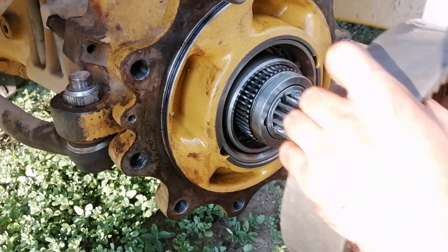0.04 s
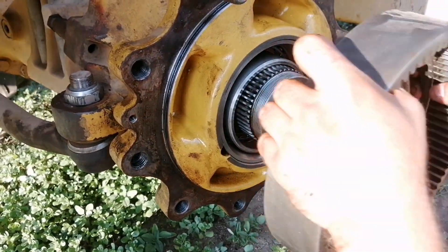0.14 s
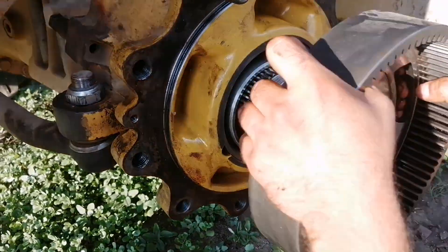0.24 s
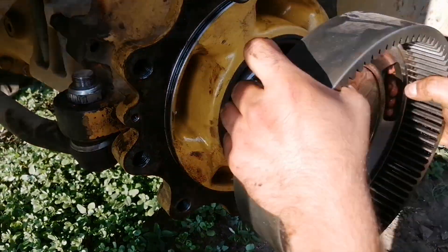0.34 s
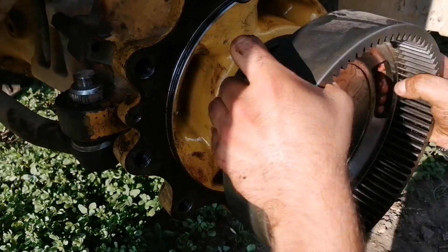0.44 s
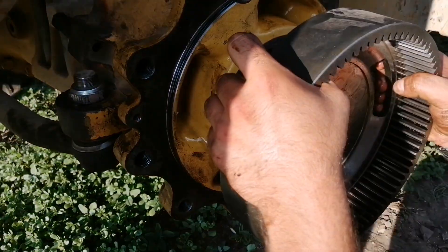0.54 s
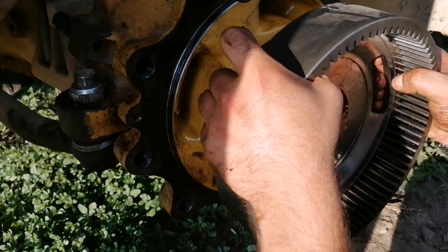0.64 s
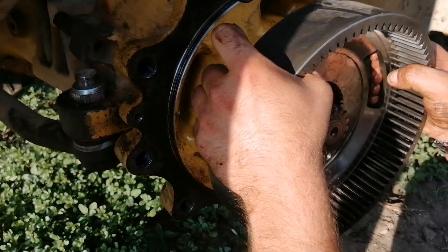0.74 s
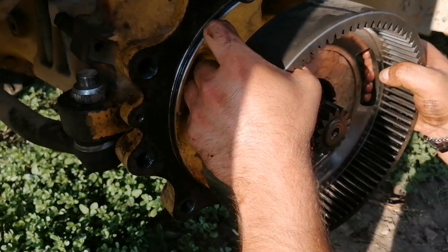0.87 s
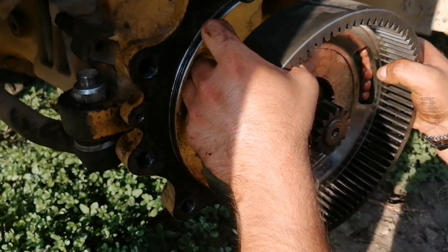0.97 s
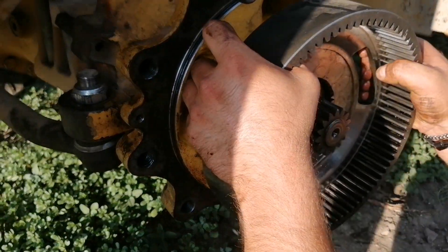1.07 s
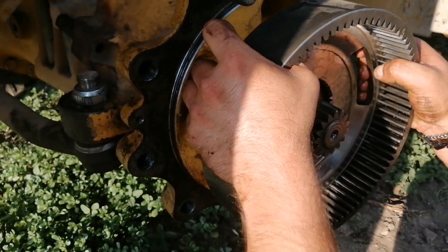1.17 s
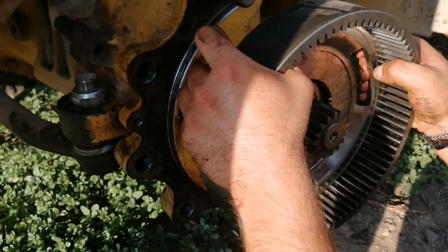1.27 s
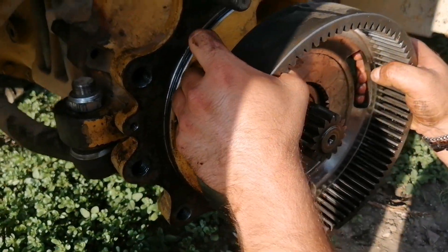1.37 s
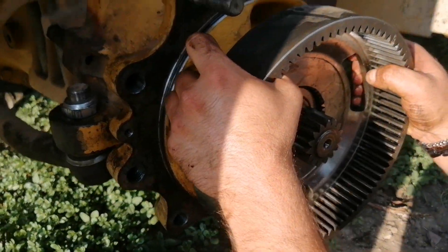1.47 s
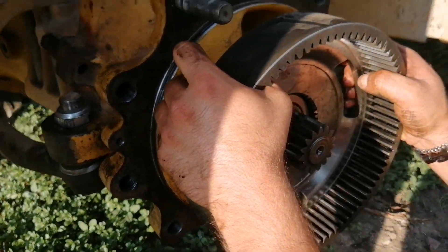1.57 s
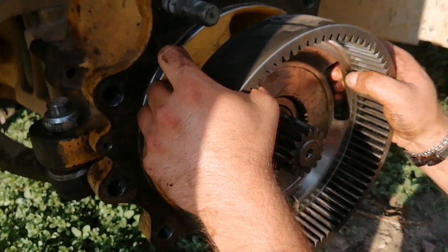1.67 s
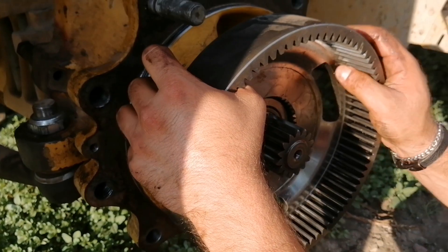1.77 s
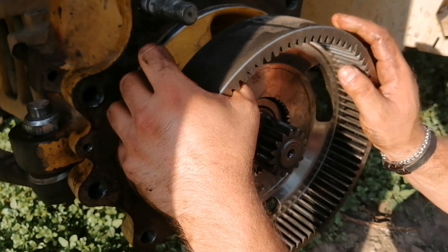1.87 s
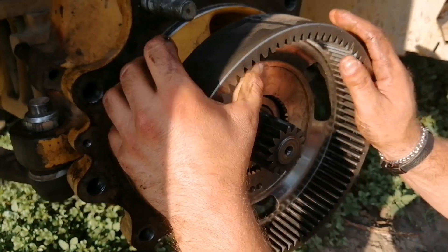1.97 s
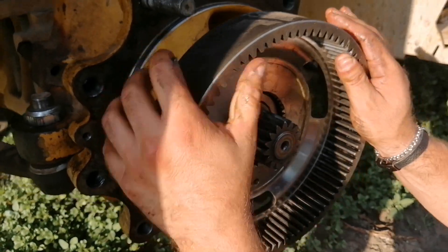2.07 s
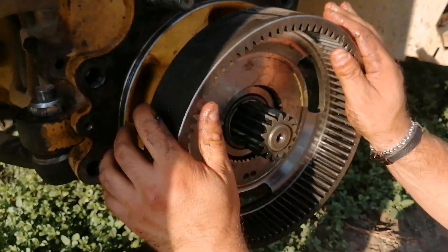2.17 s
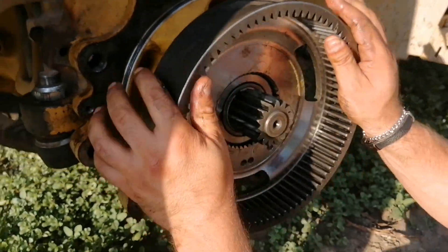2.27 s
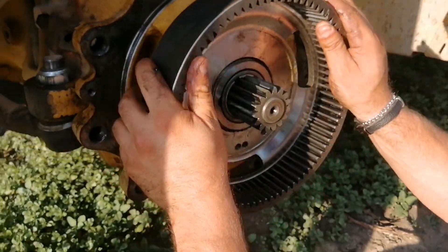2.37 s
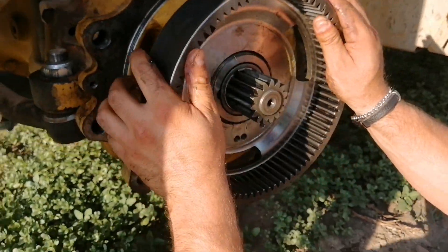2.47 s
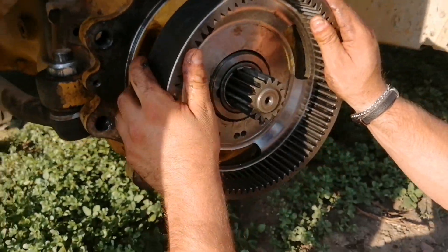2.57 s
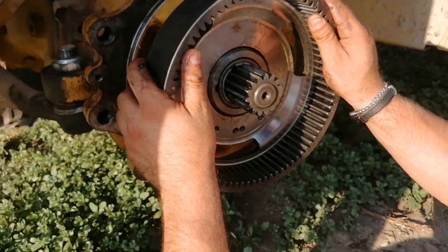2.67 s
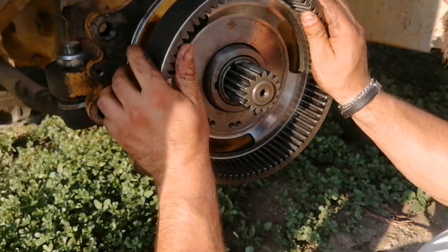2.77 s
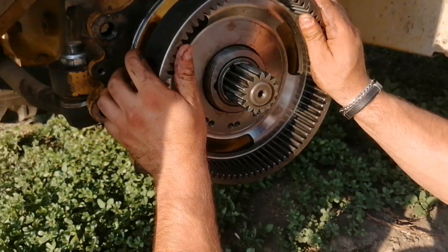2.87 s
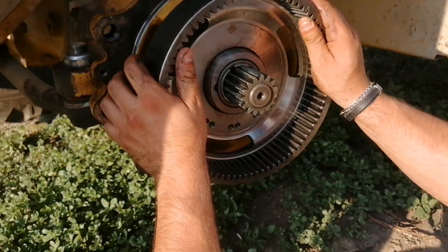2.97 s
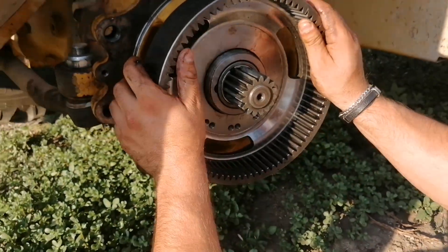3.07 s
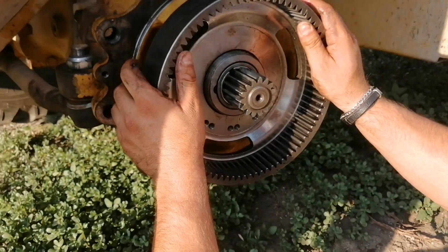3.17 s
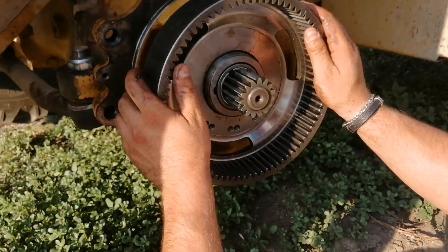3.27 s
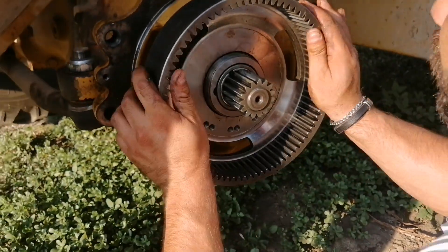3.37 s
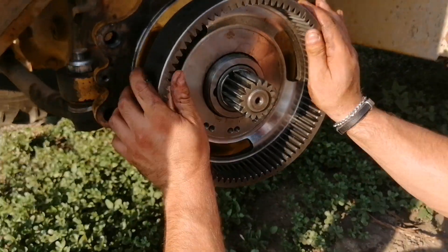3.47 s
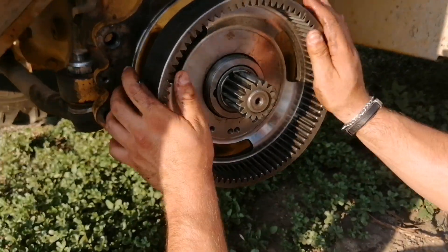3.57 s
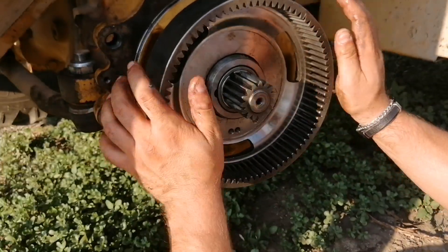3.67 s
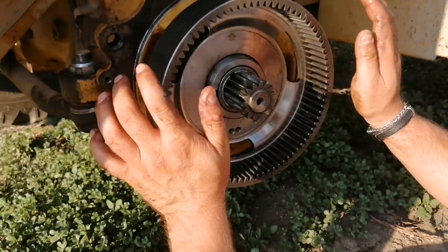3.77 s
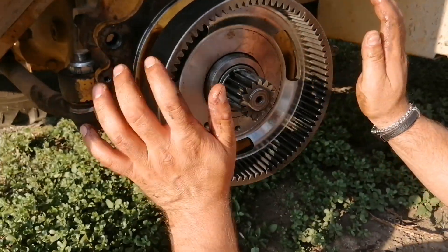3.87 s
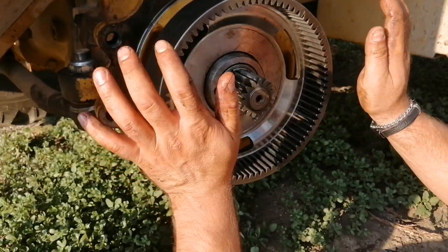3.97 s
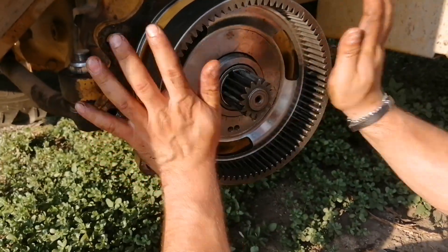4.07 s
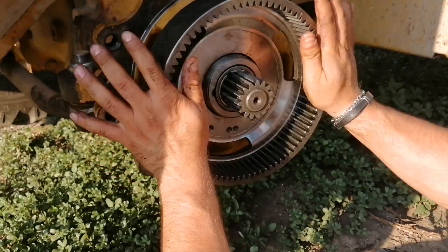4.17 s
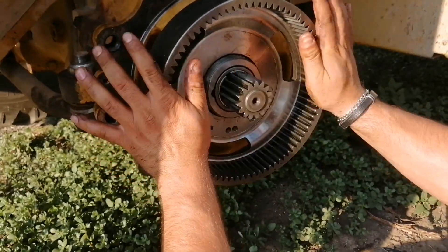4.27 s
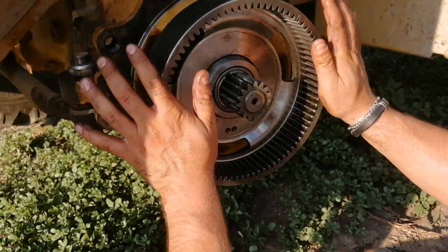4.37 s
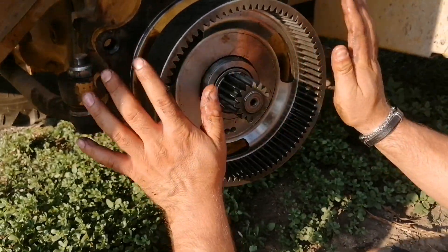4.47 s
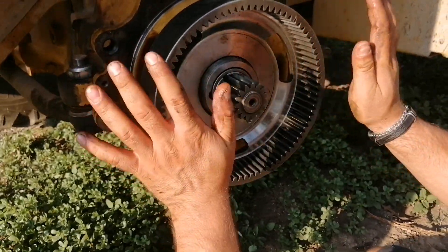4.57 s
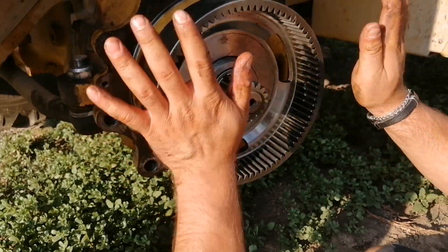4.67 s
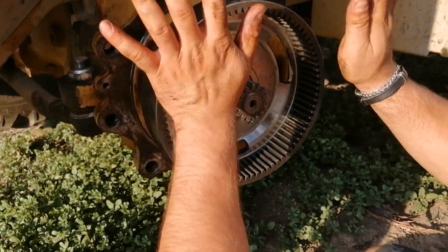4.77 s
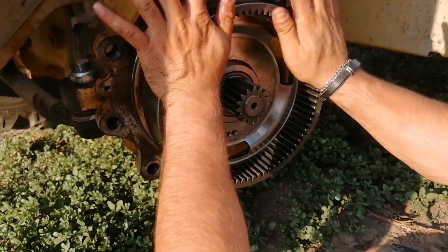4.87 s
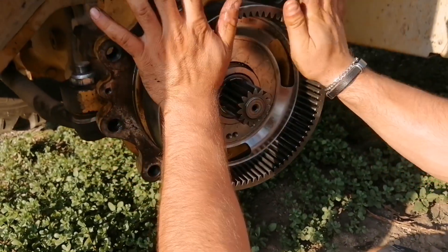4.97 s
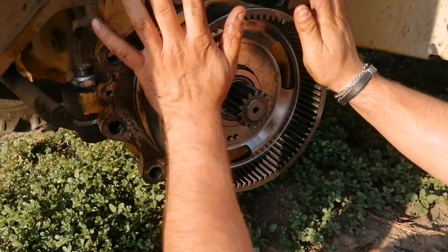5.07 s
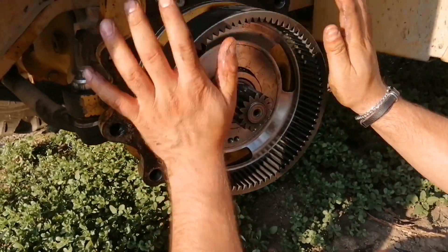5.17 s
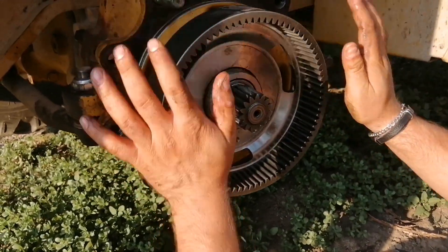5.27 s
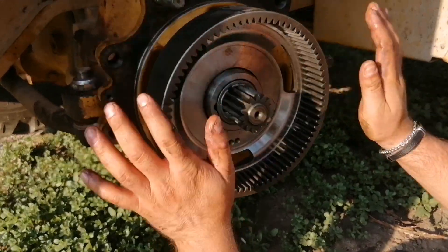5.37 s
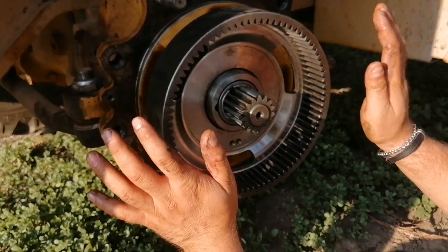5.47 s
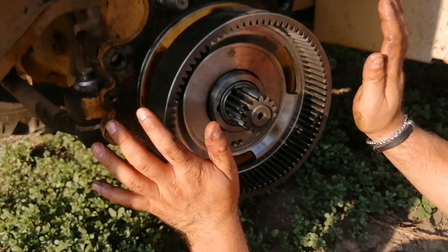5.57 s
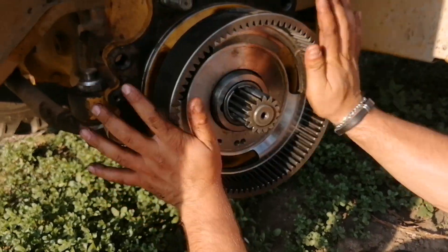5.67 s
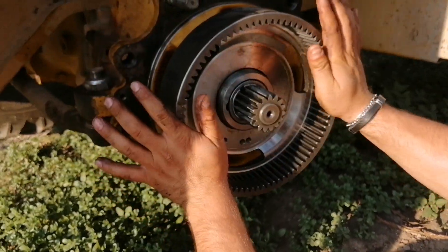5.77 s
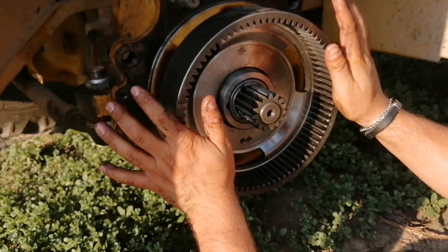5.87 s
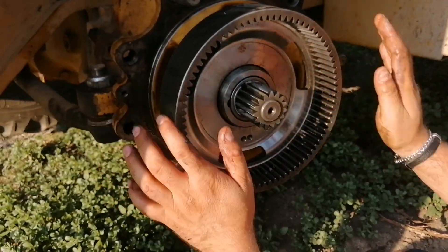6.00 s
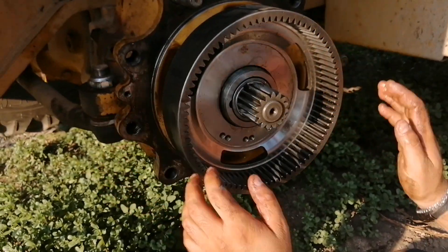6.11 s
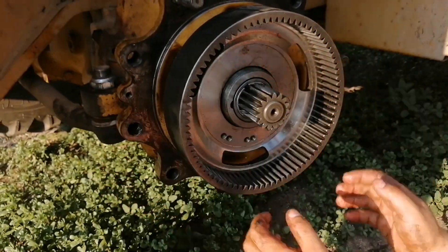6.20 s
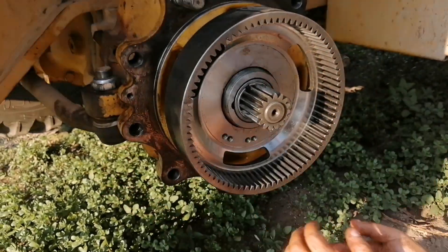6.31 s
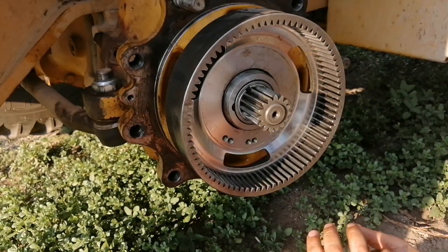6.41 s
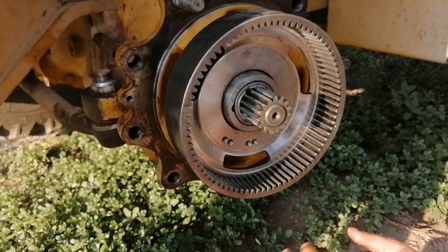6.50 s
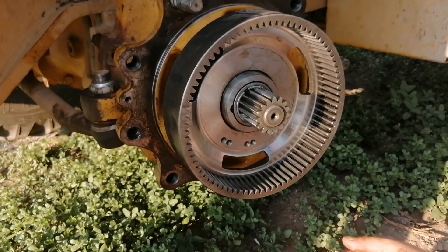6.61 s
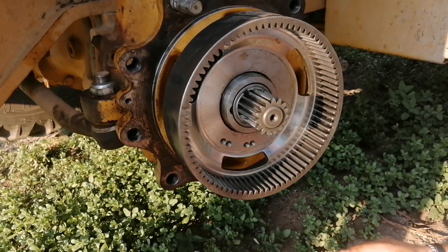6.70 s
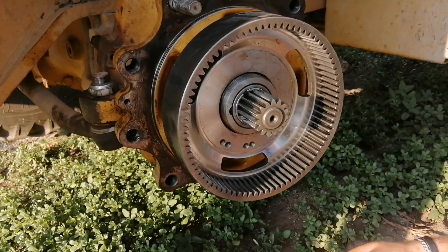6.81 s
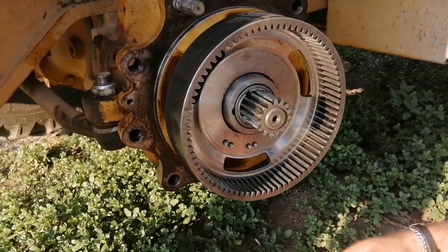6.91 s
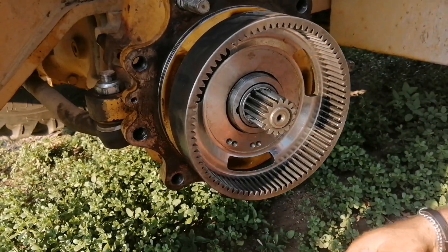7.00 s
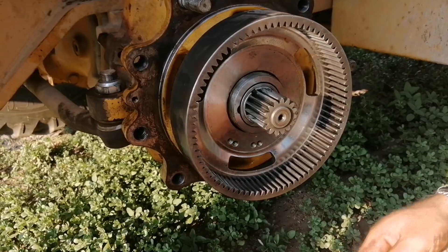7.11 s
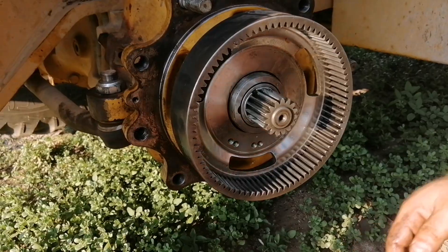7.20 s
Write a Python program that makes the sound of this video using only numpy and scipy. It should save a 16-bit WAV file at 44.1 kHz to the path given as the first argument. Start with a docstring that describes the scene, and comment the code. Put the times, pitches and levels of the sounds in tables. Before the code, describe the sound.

A heavy steel gear knocks, scrapes and briefly squeals onto a splined shaft outdoors, clanking home at three seconds, then sparse clunks with faint bird chirps.

```python
"""A heavy steel ring gear is worked by hand onto a splined axle shaft, outdoors and close to two microphones.
Its teeth knock on the splines: each blow is a sum of fading tones. A low boom, set separately, follows
some of the blows and strokes. Sliding makes shaped noise, ringing resonances and short squeals; the hub face drags.
Hands scuff and bump as soft noise; a small bird calls in gliding tones far off, above a quiet noise background."""
import sys
import numpy as np
from scipy import signal
from scipy.fft import rfft, irfft, next_fast_len
from scipy.io import wavfile
from scipy.ndimage import uniform_filter1d

SR = 44100
rng = np.random.default_rng(int(sys.argv[2]) if len(sys.argv) > 2 else 0)


def int16_out(signal):
    """Quantize to a 16-bit WAV file."""
    q = np.round(np.clip(np.atleast_2d(signal).T, -1, 1) * 32767)
    wavfile.write(sys.argv[1], SR, q.astype(np.int16))


N = 319591
TIME = np.arange(N) / SR  # seconds

# Levels, tones and fade times below are starting points; the functions add gains and chance variation.
# Teeth hitting splines: (t/s, level/dB, bass/dB, treble/dB, favoured f/Hz, contact/s, left minus right/dB)
TOOTH_KNOCKS = [(0.6521, -18, -10.5, -3.5, 1480, 0.00019, -2), (0.6538, -15, -17, -1, 3100, 0.00031, -1),
                (0.7646, -37.5, -3, -15, 1270, 0.0047, -3), (0.7849, -33.5, -3.5, -4.5, 2400, 0.0011, -6),
                (0.873, -57, 8.5, 3, 6000, 0.0051, -2), (0.9756, -36, 6, -10.5, 1510, 0.0051, 3.5),
                (0.9946, -24, -0.5, -14.5, 1600, 0.0033, 6.5), (1.005, -24, -4, -17, 1100, 0.0052, 2),
                (1.028, -39, -1, -11, 2390, 0.0042, 10), (1.083, -22.5, -1.5, -2, 2500, 0.0033, 5),
                (1.348, -51, 12.5, -32, 1000, 0.0041, 6), (1.446, -35.5, 1, -26, 1400, .003, 11),
                (1.455, -33, -2, -21, 950, .002, 2.5), (1.7185, -51, -2.5, -20, 1200, 0.0075, -2),
                (1.8354, -42.5, 7.5, -11.5, 830, 0.0028, -0.5), (2.1368, -33, 1, -9.5, 6040, 0.00033, -5),
                (2.4462, -29, -10.5, -9, 1200, 0.0037, -7), (2.526, -29.5, -24, 11.5, 5000, .003, 3.5),
                (2.9179, -31, -3, -6.5, 900, 0.0027, -0.5), (2.945, -21, -1, -8, 620, 0.002, 0.5),
                (2.965, -13.5, -4, -1, 760, 0.0023, 3), (3.4, -42.5, -23, 1, 2370, 0.014, -4),
                (3.648, -28.5, 6, 3.5, 1730, 0.0058, -2), (3.8022, -42, -0.5, -10.5, 2500, 0.0047, -7),
                (4.2274, -57.5, -16, -0.5, 2300, 0.0037, -1), (4.3, -24, -3.5, 5, 2300, 0.0013, 4),
                (4.3049, -23, 7.5, -5, 1230, 0.0013, -4.5), (4.3124, -28, 9.5, -5.5, 745, 0.0016, -3.5),
                (4.347, -37, 6.5, 1.5, 2240, .012, 1), (4.9231, -52, -23.5, -6.5, 2370, 0.0053, -5.5),
                (5.0537, -29.5, -3.5, -10, 769, 0.0024, 4), (5.064, -21, 3, 0, 1260, 0.00088, -4),
                (5.0738, -19.5, 2, 4, 5700, 0.0031, -2), (5.082, -27.5, 3, -5, 700, .002, -2),
                (5.8122, -44.5, -2.5, 4.5, 750, 0.0039, -4), (5.8267, -31, -0.5, -1, 700, 0.0019, -4),
                (5.8335, -21.5, -3, 7.5, 2000, 0.00031, -2.5), (6.928, -43, 14, -24, 1100, 0.0011, -2),
                (7.0361, -48.5, -3.5, -32, 1310, .001, -4)]
# Dense ring of the hand-damped gear: (f/Hz, level/dB)
STEEL_COLOUR = [(100, -12), (160, -5.5), (280, 6.5), (430, -6), (560, 0.5), (780, 5), (1000, -1),
                (1400, -2), (2000, -4), (2800, -5.5), (4300, -8), (6200, -10), (8000, -21.5), (14500, -37)]
# How long that dense ring lasts, to 60 dB down: (f/Hz, fade/s)
STEEL_FADE = [(150, 0.17), (700, 0.081), (2500, 0.053), (6000, 0.031), (14000, 0.021)]
# The gear's strongest modes, its natural tones: (f/Hz, level/dB, fade/s)
STRONG_GEAR_MODES = [(303, -9.5, 0.093), (540.5, -14, 0.084), (641, -19, 0.26), (724, -12, .08),
                     (762, -10.5, 0.072), (1208, -15, 0.055), (1296, -19, 0.088), (1585, -13.5, 0.058),
                     (2100, -17, 0.031), (2594, -13.5, 0.066), (2925, -15.5, 0.064), (3780, -17, 0.08),
                     (4800, -15.5, 0.046), (5860, -14, 0.035), (5880, -16, 0.047)]
# Low booming tails: (t/s, level/dB, fade/s)
BOOM_TAILS = [(0.654, -46.5, 1.7), (0.995, -34, 1.05), (1.085, -38.5, 1.01), (1.45, -28, 0.36),
              (1.839, -40, 0.28), (2.099, -55, 0.41), (2.966, -32, 1.77), (3.65, -61, .4),
              (4.31, -32, 0.87), (5.071, -34, 0.98), (5.833, -39, 0.43), (6.928, -36.5, 0.16)]
# Tone colour of the boom: (f/Hz, level/dB)
BOOM_COLOUR = [(90, -13.5), (140, 1.5), (200, 4.5), (290, -1.5), (380, -1), (470, -9.5), (640, 1.5),
               (850, -2), (960, -12.5)]
# The gear slips along the splines in short jerks: (t/s, length/s, grinding level/dB, ringing level/dB)
SPLINE_SLIPS = [(1.480, 0.023, -37.5, -36.5), (2.447, 0.07, -42.5, -38), (2.507, .018, -33.5, -38.5),
                (2.524, .021, -32.5, -34), (2.553, .018, -45.5, -34), (2.574, .04, -40.5, -36),
                (2.927, 0.012, -36, -38), (2.946, 0.025, -26.5, -34)]
# Tone colour of the grinding: (f/Hz, level/dB)
GRIND_COLOUR = [(500, -13.5), (1100, 8.5), (1900, -3.5), (3200, 4.5), (4300, 1), (6300, 0.5), (8200, -17.5),
                (9800, -3), (11500, -25.5), (13300, 1), (15000, -26)]
# What the sliding gear rings with: (f/Hz, level/dB, fade/s)
SLIDING_MODES = [(1177, -8, 0.05), (2406, -7.5, 0.097), (3090, -19.5, .05), (3310, -7, 0.24),
                 (3470, -3, 0.034), (3910, -11, 0.022), (4820, -21, 0.038), (5610, -16, 0.048),
                 (6240, -4, 0.087), (7220, -9, 0.16), (10080, -26, 0.6), (12900, -25.5, 0.13),
                 (13820, -23.5, .14), (14135, -26, 1.0), (14481, -30.5, .12)]
# Friction locks onto the squealing modes: (t/s, length/s, lower mode level/dB, upper mode level/dB)
SPLINE_SQUEALS = [(1.487, 0.014, -28, -31), (1.506, .014, -35, -30.5), (2.448, 0.012, -48.5, -35.5),
                  (2.469, 0.0093, -22.5, -43.5), (2.521, 0.007, -18, -22.5), (2.578, 0.02, -19.5, -47.5),
                  (2.596, .026, -30.5, -27)]
# The two squealing modes, lower then upper: (f/Hz)
SQUEAL_MODES = [3359, 6340]
# The hub face drags as the gear is turned: (t/s, length/s, level/dB)
HUB_DRAGS = [(1.29, .07, -65), (1.74, 0.13, -61), (1.94, 0.073, -59), (3.645, 0.022, -33.5),
             (3.70, 0.074, -64), (3.765, 0.051, -49.5)]
# Tone colour of the hub drag: (f/Hz, level/dB)
HUB_COLOUR = [(900, -20), (1500, -4), (2150, -6), (2550, 4.5), (2850, -10), (3400, -11), (7000, -44.5)]
# Strokes of skin over oily steel: (t/s, length/s, level/dB)
HAND_SCUFFS = [(1.82, 0.22, -57.5), (2.064, 0.081, -40.5), (2.15, 0.091, -62), (2.25, 0.38, -59),
               (3.42, 0.31, -62.5), (3.645, 0.033, -45), (4.345, 0.028, -54), (5.26, 0.098, -64),
               (5.715, 0.033, -50.5), (6.922, 0.019, -48.5), (6.96, 0.075, -60), (7.0, 0.27, -66)]
# Tone colour of the scuffs: (f/Hz, level/dB)
SCUFF_COLOUR = [(100, -5), (600, 7), (1200, 1), (1900, 0), (2600, 2), (3300, -3.5), (4500, -8),
                (6500, -4.5), (8500, -13), (13500, -16.5), (15500, -19.5)]
# Soft bumps of a hand: (t/s, level/dB, pitch f/Hz)
HAND_BUMPS = [(0.273, -52.5, 127), (0.409, -56, 141), (3.965, -48, 161), (5.509, -41.5, 165.7)]
# Bird notes: (t/s, length/s, start f/Hz, middle f/Hz, end f/Hz, level/dB)
BIRD_NOTES = [(0.315, 0.071, 4500, 4180, 3660, -69), (0.452, 0.05, 5860, 6070, 5840, -72),
              (1.15, 0.047, 5170, 4990, 4700, -71.5), (1.19, 0.098, 3700, 3530, 3750, -68.5),
              (3.972, 0.055, 4440, 5110, 4570, -45.5), (4.062, 0.043, 4350, 4405, 3500, -51),
              (4.812, 0.061, 4660, 4920, 4680, -52), (4.865, 0.056, 3840, 3476, 3240, -60.5),
              (5.437, 0.034, 6050, 6020, 5860, -54), (6.021, 0.061, 4640, 4910, 4650, -66),
              (6.69, 0.057, 5200, 5000, 4640, -70.5)]
# Tone colour of the outdoor background: (f/Hz, level/dB)
AIR_COLOUR = [(25, -1.5), (60, 2), (140, -9.5), (300, -14.5), (600, -19), (1400, -23.5), (2700, -21.5),
              (6500, -31), (9000, -37), (15000, -47)]
# Swell of the background: (t/s, level/dB)
AIR_SWELL = [(0, -64), (1.5, -63.5), (3, -64.5), (4, -60), (6.1, -66.5), (6.6, -61.5), (7.25, -60)]
# How alike the two microphones sound: (f/Hz, likeness from -1 to 1)
MIC_LIKENESS = [(30, -0.5), (120, 0.5), (400, 0.85), (800, 0.67), (1500, -0.2), (3000, 0.11), (8000, 0.7)]
# Balance of the ringing gear at the microphones: (f/Hz, left minus right/dB)
MIC_BALANCE = [(200, 5), (700, 7), (1500, 3.5), (3000, 1.5), (6000, -2.5), (13000, 5.5)]

# Stroke shapes: the share of the length spent building up, then the fade time in s (60 dB down)
SLIP_ATTACK_SHARE, SLIP_T60_S = 0.098, 0.1
SQUEAL_ATTACK_SHARE, SQUEAL_T60_S, SQUEAL_LINGER_T60_S = 0.83, 0.038, 0.22
DRAG_ATTACK_SHARE, DRAG_T60_S = 0.67, 0.14
SCUFF_ATTACK_SHARE, SCUFF_T60_S = 0.32, 0.14
TOP_HZ = 14900  # the recorder cuts above this


def undb(db):
    """Decibels to gain."""
    return 10 ** (np.asarray(db) / 20)


def at(points, hz):
    """Read (Hz, value) points on a log-frequency axis."""
    f, value = np.transpose(points)
    return np.interp(np.log(np.maximum(hz, 1)), np.log(f), value)


def unit(x):
    """Scale to an rms (average strength) of 1."""
    return x / np.sqrt(np.mean(x ** 2) + 1e-18)


def fade(t, t60):
    """Free decay, 60 dB down after t60 seconds."""
    return np.exp(-np.log(1000) * t / t60)


def pan(db):
    """Left and right gains for a level difference in dB."""
    return undb(np.array([[1], [-1]]) * db / 2)


def add(out, s, x):
    """Mix x into out from time s."""
    i = int(s * SR)
    out[:, i:i + x.shape[1]] += x[:, :N - i]


def heard(pair, colour):
    """Colour two unrelated signals and blend them to the microphones' likeness at each frequency."""
    n = pair.shape[1]
    hz = np.fft.rfftfreq(n, 1 / SR)
    alike = np.clip(at(MIC_LIKENESS, hz), -1, 1)
    mid, side = rfft(pair) * np.sqrt([1 + alike, 1 - alike]) * undb(at(colour, hz))
    return unit(irfft([mid + side, mid - side], n))


def grit(colour, spread_db):
    """Endless tiny contacts of very uneven size; smooth noise when the spread is small."""
    size = next_fast_len(N, True)
    contact_db = spread_db * np.minimum(rng.exponential(size=size), 5)
    contacts = rng.standard_normal((2, size)) * undb(contact_db)
    return heard(contacts, colour)[:, :N]


def walk(rate):
    """Smooth random wandering, rate new values per second, with rms 1."""
    k = max(int(SR / rate), 1)
    steps = np.repeat(rng.standard_normal(N // k + 1), k)[:N]
    return unit(uniform_filter1d(steps, k))


def strokes(rows, attack_share, t60):
    """One gain curve per level column of (s, length, dB, ..) rows: pressure builds, holds, then lets go."""
    gains = np.zeros((len(rows[0]) - 2, N))
    for s, length, *db in rows:
        t = TIME[:int((length + 2 * t60) * SR)]
        build = np.minimum(t / (attack_share * length), 1)
        release = fade(np.maximum(t - length, 0), t60)
        add(gains, s, undb(db)[:, None] * build * release)
    return gains


def modes(hz, t60, weights, size):
    """Sum of fading tones; each row of complex weights is one way of striking them."""
    poles = (2j * np.pi * hz - np.log(1000) / t60).astype(np.complex64)
    tones = np.exp(poles[:, None] * TIME[:size].astype(np.float32))
    return (weights.astype(np.complex64) @ tones).imag


def knock(hz, bass_db, treble_db):
    """Colour of one blow in dB at each mode: heavy when square, bright when glancing."""
    bass = bass_db * at([(700, 1), (1300, 0)], hz)
    treble = treble_db * at([(2800, 0), (5500, 1)], hz)
    return bass + treble


def knocks(gain_db=3.5, favour_db=7, favour_octaves=0.22, uneven_db=1.9, t60_scatter=0.27, rise_cycles=0.89,
           chatter_db=-4, scatter_db=-14, scatter_t60=0.12, count=700, size=11000):
    """Gear teeth hit the splines: each blow wakes the same crowd of modes in its own proportions."""
    out, t = np.zeros((2, N)), TIME[:size]
    grid = np.linspace(np.sqrt(STEEL_COLOUR[0][0]), np.sqrt(STEEL_COLOUR[-1][0]), count) ** 2
    spacing = np.gradient(grid)
    crowd_hz = grid + spacing * (rng.random(count) - 0.5)
    life = np.exp(t60_scatter * np.clip(rng.standard_normal(count), -2, 2))
    # a mode that radiates less rings for longer
    crowd = unit(undb(at(STEEL_COLOUR, crowd_hz)) * np.sqrt(spacing / life)) * np.sqrt(2 / count)
    strong_hz, strong_db, strong_t60 = np.transpose(STRONG_GEAR_MODES)
    hz = np.r_[crowd_hz, strong_hz]
    t60 = np.r_[at(STEEL_FADE, crowd_hz) * life, strong_t60]
    strength = np.r_[crowd, undb(strong_db)] * pan(at(MIC_BALANCE, hz))
    # less alike at the microphones means wider phase differences between left and right
    alike = np.clip(at(MIC_LIKENESS, hz), 0.05, 1)
    apart = np.array([[1], [-1]]) * np.sqrt(-np.log(alike) / 2)

    weights = []
    for s, db, bass_db, treble_db, favoured_hz, contact_s, pan_db in TOOTH_KNOCKS:
        # each spot of contact favours some modes
        octaves_off = np.log2(hz / favoured_hz) / favour_octaves
        colour = knock(hz, bass_db, treble_db) + favour_db * np.exp(-0.5 * octaves_off ** 2)
        uneven, turn, side = rng.standard_normal((3, len(hz)))
        gain = undb(db + gain_db + colour + uneven_db * uneven) * pan(pan_db)
        weights.append(strength * gain * np.exp(1j * (np.pi * turn + apart * side)))
    weights = np.concatenate(weights)
    # the heavy low modes take longer to build up: take away a faster-fading copy
    short_t60 = 1 / (1 / t60 + hz / rise_cycles / np.log(1000))
    rings = modes(hz, t60, weights, size) - modes(hz, short_t60, weights, size)

    for (s, *_, contact_s, _), ring in zip(TOOTH_KNOCKS, rings.reshape(-1, 2, size)):
        # the faces chatter and scrape for a moment after the first touch
        chatter = rng.standard_normal(size) * np.exp(-t / max(contact_s, 1 / SR)) * np.sqrt(t)
        push = undb(chatter_db) * unit(chatter) / np.sqrt(size)
        # a longer contact starts with a weaker first touch
        push[0] += 1.0 / (1 + contact_s / 0.0023)
        # the machine and the ground scatter the blow back, differently to each microphone
        tail = rng.standard_normal((2, size)) * fade(t, scatter_t60) * (1 - np.exp(-t / 0.0024))
        scatter = undb(scatter_db) * unit(tail) / np.sqrt(size)
        blow = signal.fftconvolve(ring, push + scatter, axes=1)[:, :size]
        add(out, s, unit(blow) * ring.std())
    return out


def booms(count=70, knee_hz=320, pan_db=6, rise_s=0.015, uneven_db=2.5, t60_scatter=0.33,
          waver_hz=11, waver_s=0.03):
    """Low tail of many close fading tones, made rough by random pitch drift; higher tones tend to die first."""
    out, t = np.zeros((2, N)), TIME[:SR].astype(np.float32)
    detune, uneven, life = rng.standard_normal((3, count))
    hz = np.geomspace(BOOM_COLOUR[0][0], BOOM_COLOUR[-1][0], count) * (1 + 0.0084 * detune)
    tone_db = at(BOOM_COLOUR, hz) + uneven_db * np.clip(uneven, -1.5, 1.5)
    size = (unit(undb(tone_db)) * np.sqrt(2 / count)).astype(np.float32)
    life = np.minimum(1, knee_hz / hz) * np.exp(t60_scatter * life)
    # each tone's pitch drifts between random values waver_s apart
    drift = rng.standard_normal((count, count))
    waver = np.array([np.interp(t / waver_s, np.arange(count), steps) for steps in drift])
    angle = (2 * np.pi * np.cumsum(hz[:, None] + waver_hz * waver, axis=1) / SR).astype(np.float32)
    for (s, db, t60), turn in zip(BOOM_TAILS, rng.random((len(BOOM_TAILS), count, 1))):
        decay = (np.log(1000) / (t60 * life))[:, None].astype(np.float32)
        tones = np.sin(angle + (2 * np.pi * turn).astype(np.float32))
        boom = size @ (tones * np.exp(-decay * t))
        # soft start, and a short fade at the end of the one-second boom
        edges = (1 - np.exp(-t / rise_s)) * np.minimum(1, 10 * (1 - t))
        add(out, s, boom * edges * undb(db) * pan(pan_db))
    return out


def slides(judder_db=3, waver=0.0057, throb_db=2.5, seated_s=2.98, choke_t60=0.064, bite_db=-30,
           soft_hz=6500, linger_db=-15):
    """Stick-slip on the splines: grinding, the modes it keeps ringing, and two modes that lock into a squeal."""
    grind, ring = strokes(SPLINE_SLIPS, SLIP_ATTACK_SHARE, SLIP_T60_S)
    judder = undb(judder_db * walk(220))
    rasp = grit(GRIND_COLOUR, 3.0)
    # light pressure sounds dull; the top only opens when the edges bite
    dull = signal.sosfiltfilt(signal.butter(4, soft_hz, fs=SR, output="sos"), rasp)
    bite = np.minimum(grind / undb(bite_db), 1)
    out = grind * judder * (dull + bite * (rasp - dull))

    # rough noise drives one resonator per mode
    push = ring * judder * rng.standard_normal((2, N)) + 1e-18
    for hz, db, t60 in SLIDING_MODES:
        radius, angle = fade(1 / SR, t60), 2 * np.pi * hz / SR
        level = np.sqrt(2 * (1 - radius ** 2)) * np.sin(angle)
        gain = undb(db) * level * pan(at(MIC_BALANCE, hz))
        out += gain * signal.lfilter([1], [1, -2 * radius * np.cos(angle), radius ** 2], push)

    # the squeal wavers while friction drives it, then rings on cleanly
    keep = fade(1 / SR, SQUEAL_LINGER_T60_S)
    squeals = strokes(SPLINE_SQUEALS, SQUEAL_ATTACK_SHARE, SQUEAL_T60_S)
    for hz, squeal in zip(SQUEAL_MODES, squeals):
        linger = undb(linger_db) * signal.lfilter([1 - keep], [1, -keep], squeal + 1e-18)
        driven = squeal / (squeal + linger)
        phase = 2 * np.pi * np.cumsum(hz * (1 + waver * driven * walk(300))) / SR
        tone = np.sin(phase + np.array([[0], [1]])) * pan(at(MIC_BALANCE, hz))
        out += (squeal * undb(throb_db * walk(150)) + linger) * tone
    # once the gear is home its face presses on the hub and chokes the ring
    return out * fade(np.maximum(TIME - seated_s, 0), choke_t60)


def hub(patchy_db=-0.5):
    """A light, narrow-toned rub of steel on steel: uneven noise shaped by pressure."""
    pressure = strokes(HUB_DRAGS, DRAG_ATTACK_SHARE, DRAG_T60_S)
    return pressure * undb(patchy_db * walk(50)) * grit(HUB_COLOUR, 2.2)


def hands(patchy_db=2, pan_db=3):
    """Palms scuff over oily faces as the gear is turned: patchy noise shaped by pressure."""
    pressure = strokes(HAND_SCUFFS, SCUFF_ATTACK_SHARE, SCUFF_T60_S)
    return pressure * undb(patchy_db * walk(90)) * grit(SCUFF_COLOUR, 2.4) * pan(pan_db)


def bumps(octaves=0.45, rise_s=0.0068, t60=0.15, pan_db=5, size=11025):
    """The heel of a hand lands softly: a dull thud of narrow low noise with no metallic ring."""
    out, t = np.zeros((2, N)), TIME[:size]
    hz = np.maximum(np.fft.rfftfreq(size, 1 / SR), 1)
    shape = np.minimum(t / rise_s, 1) * fade(np.maximum(t - rise_s, 0), t60)
    for (s, db, pitch_hz), noise in zip(HAND_BUMPS, rng.standard_normal((len(HAND_BUMPS), size))):
        band = np.exp(-0.5 * (np.log2(hz / pitch_hz) / octaves) ** 2)
        thud = unit(irfft(rfft(noise) * band, size))
        add(out, s, undb(db) * thud * shape * pan(pan_db))
    return out


def bird(trill=0.041, echo_db=-2, echo_t60=0.14):
    """Short gliding, slightly buzzy notes, smeared by the yard."""
    song, buzz = np.zeros((2, N)), walk(900)
    for s, length, start_hz, middle_hz, end_hz, db in BIRD_NOTES:
        u = np.linspace(0, 1, int(length * SR))
        # a smooth curve through the three pitches
        glide = np.polyval(np.polyfit([0, 0.5, 1], [start_hz, middle_hz, end_hz], 2), u)
        hz = glide * (1 + trill * buzz[int(s * SR):][:len(u)])
        note = np.sin(np.pi * u) * np.sin(2 * np.pi * np.cumsum(hz) / SR)
        add(song, s, undb(db) * note[None])
    yard = unit(rng.standard_normal((2, SR // 2)) * fade(TIME[:SR // 2], echo_t60)) / np.sqrt(SR // 2)
    return song + undb(echo_db) * signal.fftconvolve(song, yard, axes=1)[:, :N]


def air(sway_db=1):
    """Light rumble and distant hiss: smooth noise that slowly swells and sways."""
    swell_db = np.interp(TIME, *np.transpose(AIR_SWELL))
    return undb(swell_db + sway_db * walk(1.8)) * grit(AIR_COLOUR, 0.5)


def scene():
    """Everything at the microphones."""
    return knocks() + booms() + slides() + hub() + hands() + bumps() + bird() + air()


def record(dry, ceiling=0.9):
    """The recorder rounds the highest peaks and cuts the top."""
    rounded = ceiling * np.tanh(dry / ceiling)
    return signal.sosfilt(signal.ellip(8, 0.2, 70, TOP_HZ, fs=SR, output="sos"), rounded)


dry = scene()
out = record(dry)
int16_out(out)
```